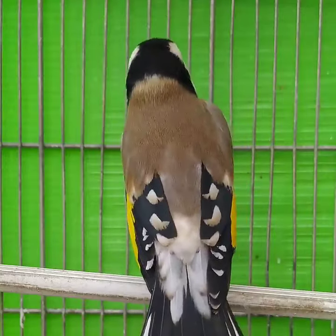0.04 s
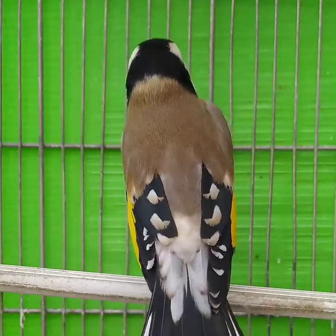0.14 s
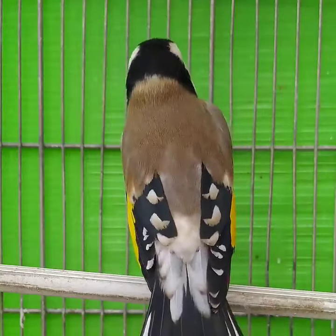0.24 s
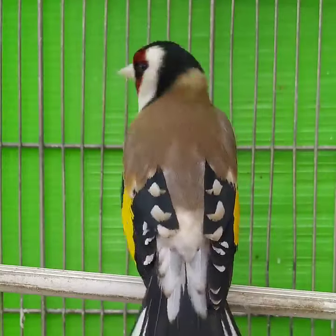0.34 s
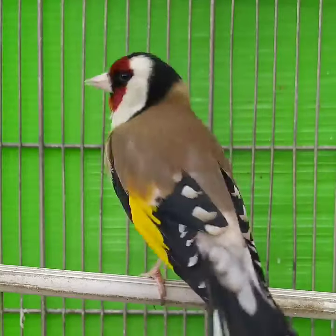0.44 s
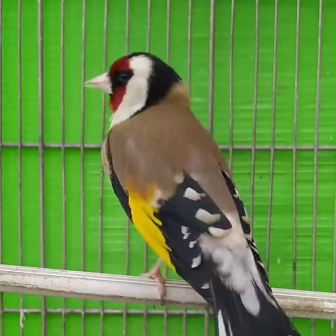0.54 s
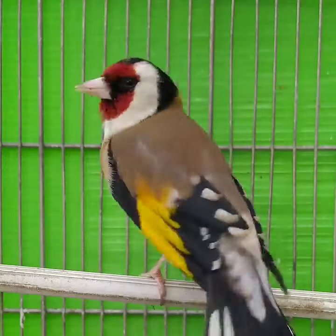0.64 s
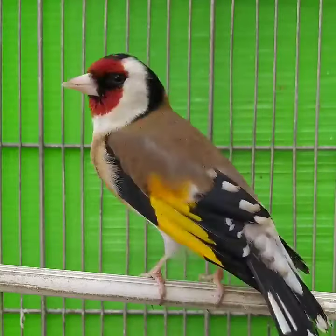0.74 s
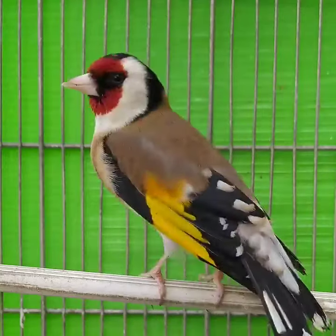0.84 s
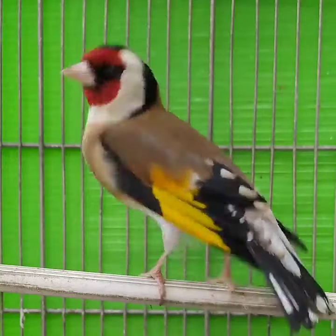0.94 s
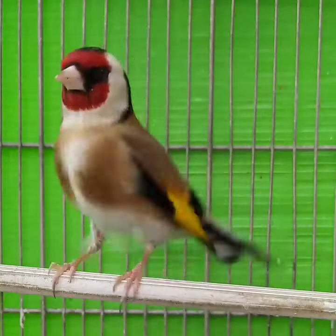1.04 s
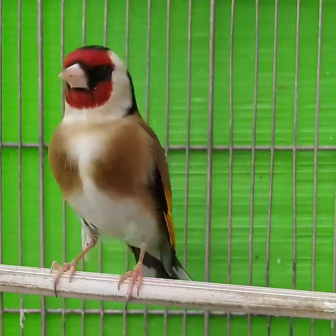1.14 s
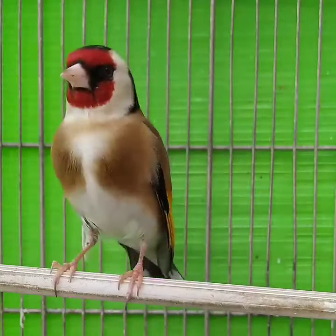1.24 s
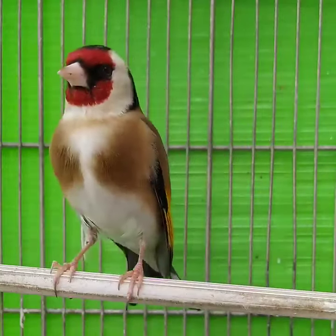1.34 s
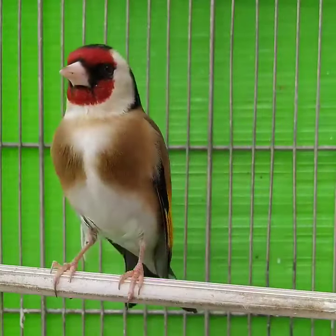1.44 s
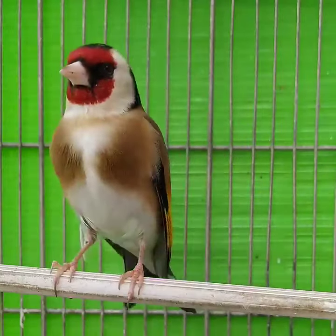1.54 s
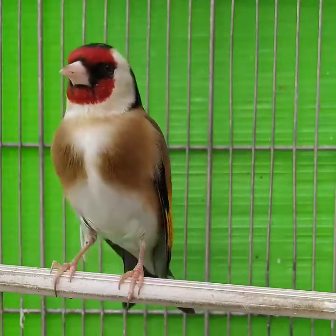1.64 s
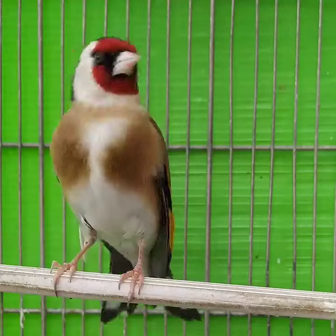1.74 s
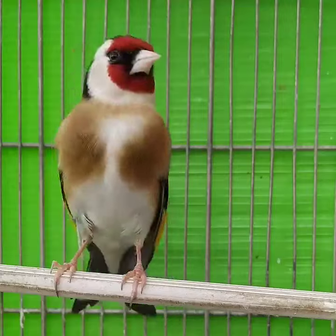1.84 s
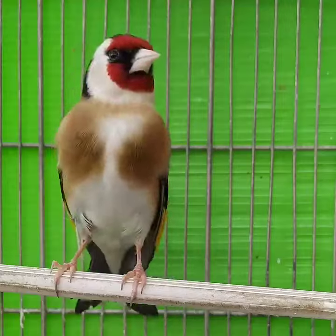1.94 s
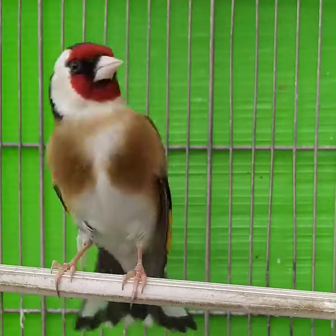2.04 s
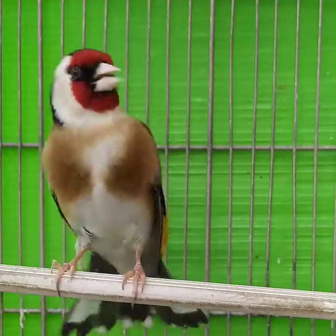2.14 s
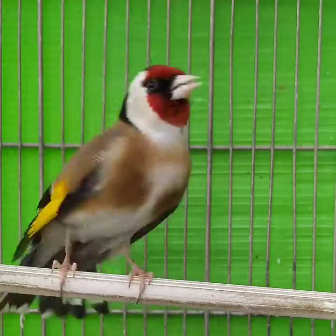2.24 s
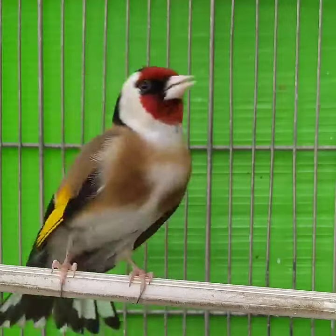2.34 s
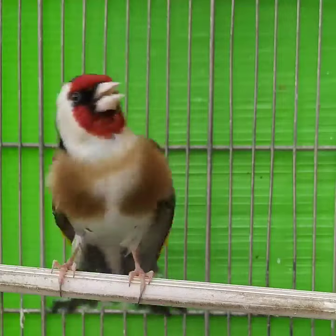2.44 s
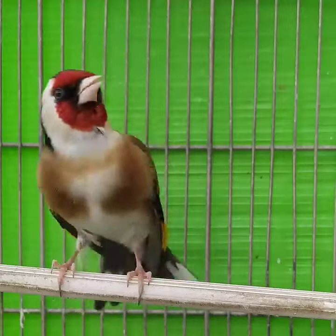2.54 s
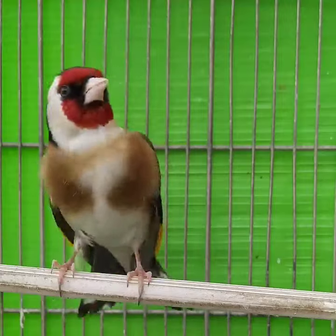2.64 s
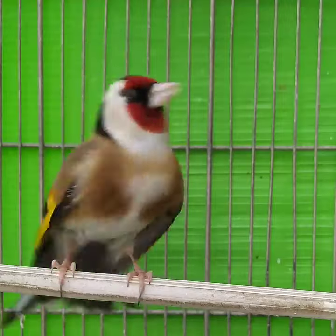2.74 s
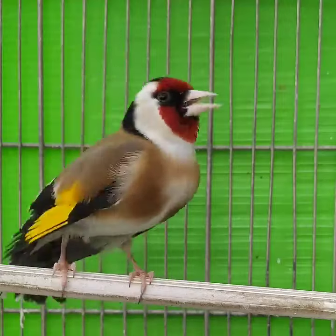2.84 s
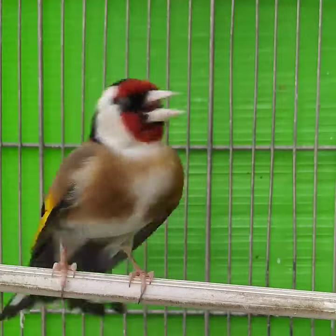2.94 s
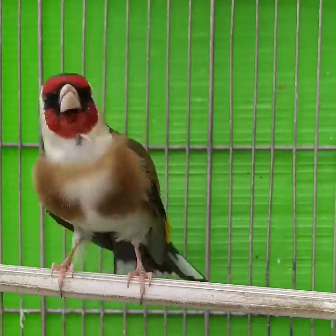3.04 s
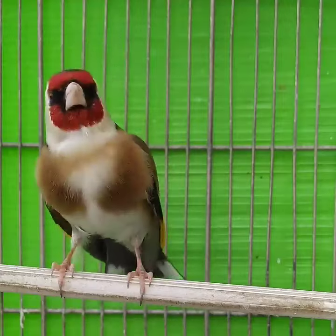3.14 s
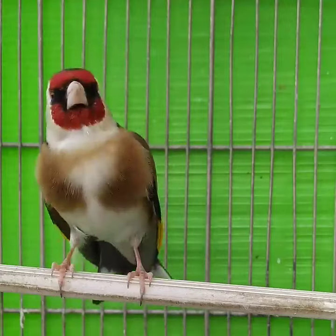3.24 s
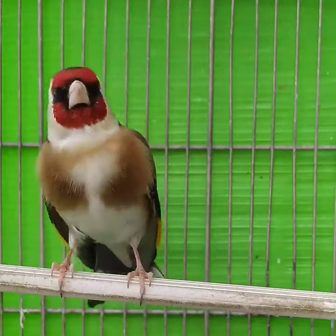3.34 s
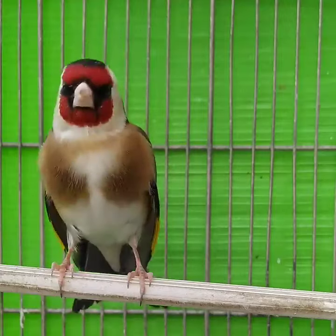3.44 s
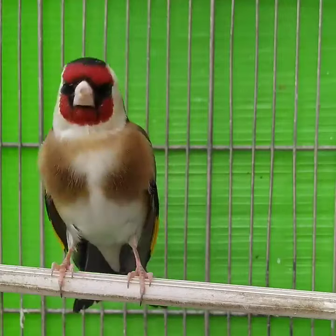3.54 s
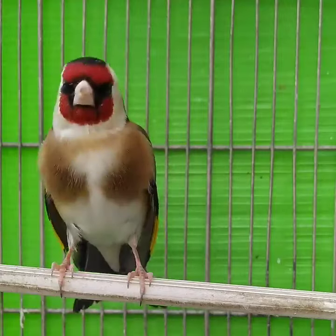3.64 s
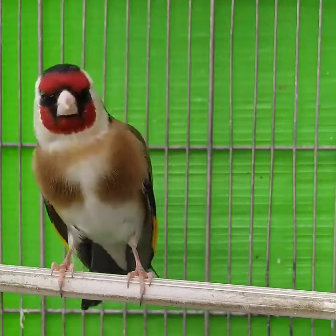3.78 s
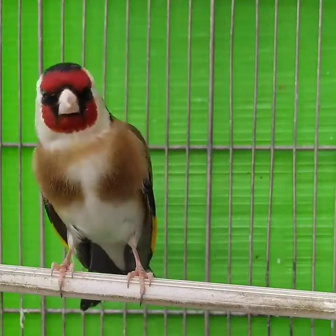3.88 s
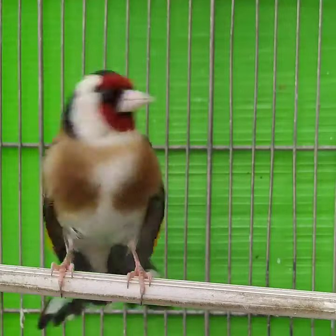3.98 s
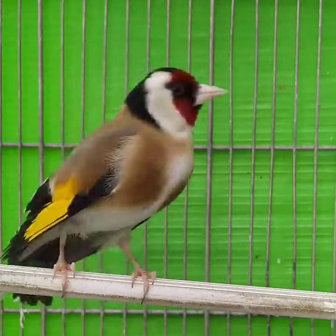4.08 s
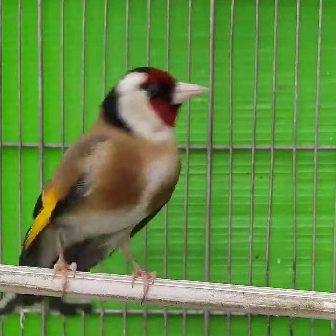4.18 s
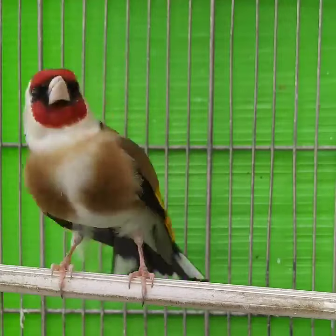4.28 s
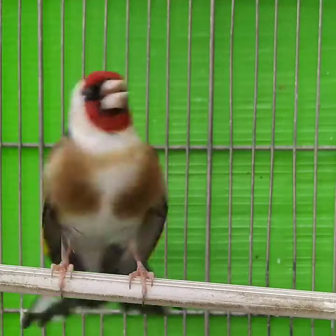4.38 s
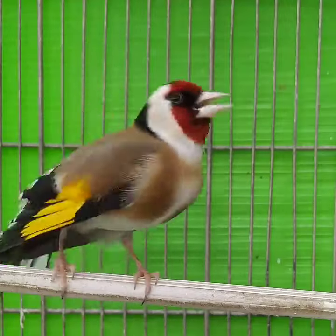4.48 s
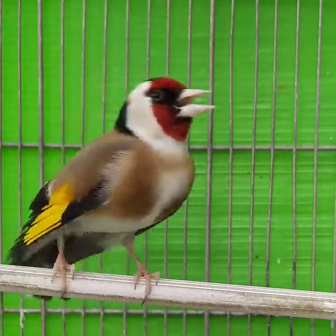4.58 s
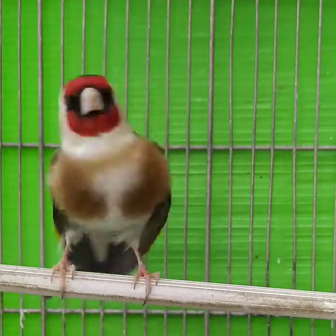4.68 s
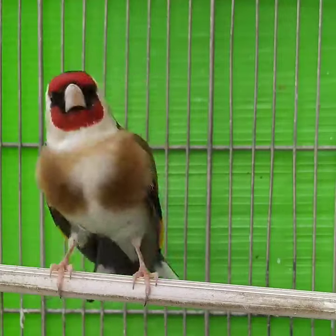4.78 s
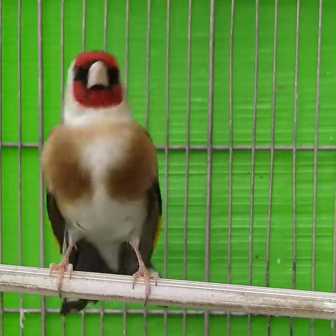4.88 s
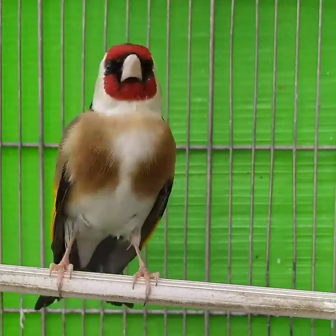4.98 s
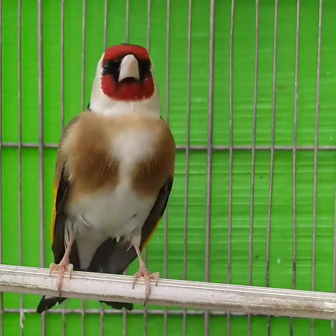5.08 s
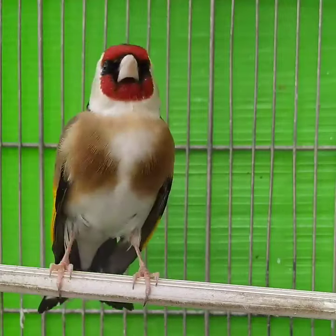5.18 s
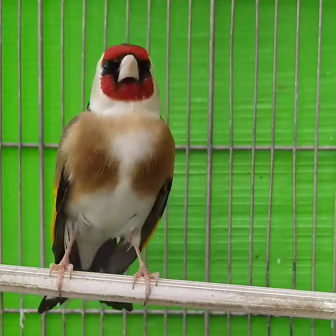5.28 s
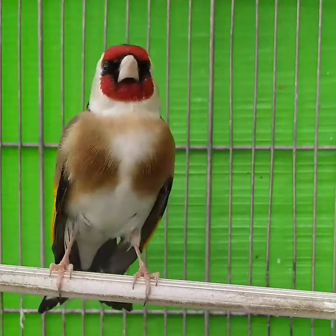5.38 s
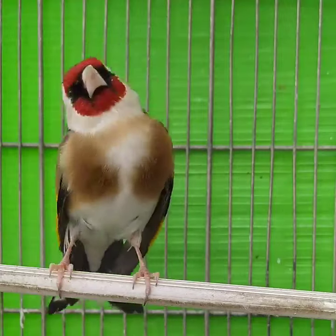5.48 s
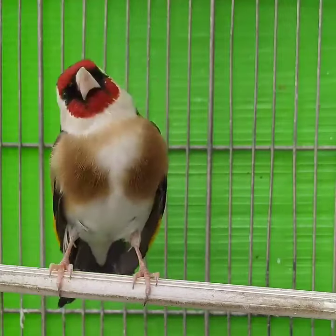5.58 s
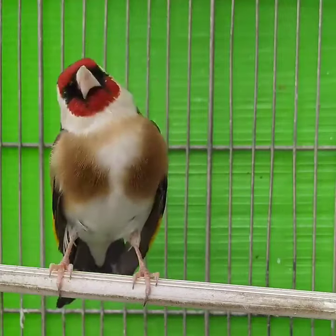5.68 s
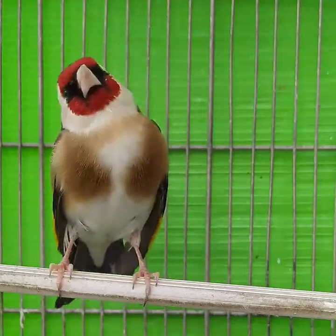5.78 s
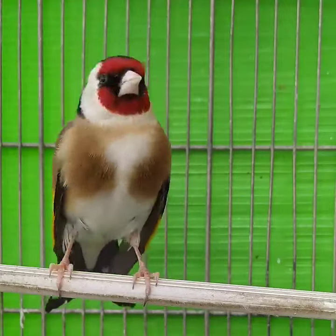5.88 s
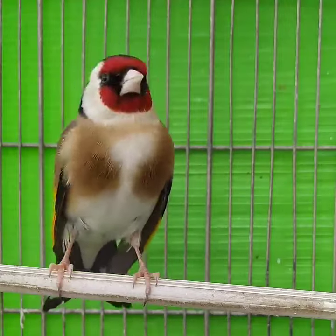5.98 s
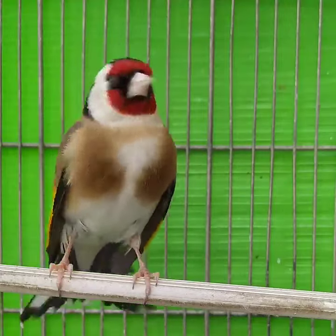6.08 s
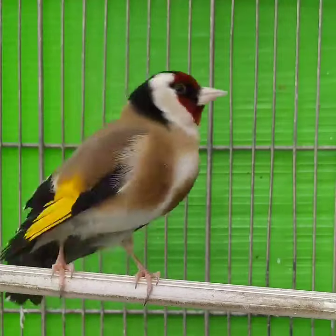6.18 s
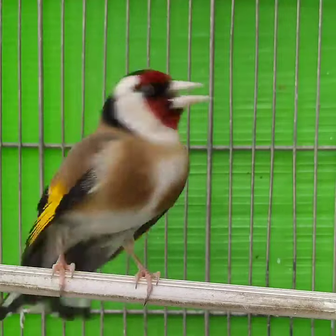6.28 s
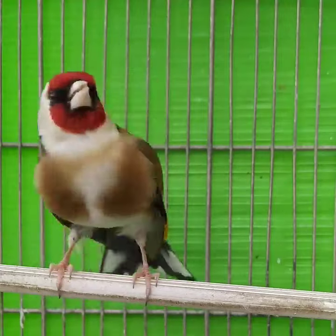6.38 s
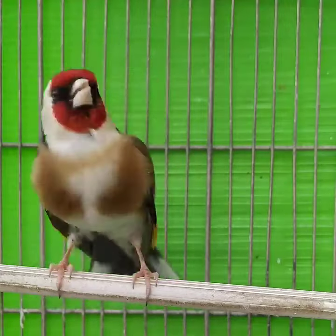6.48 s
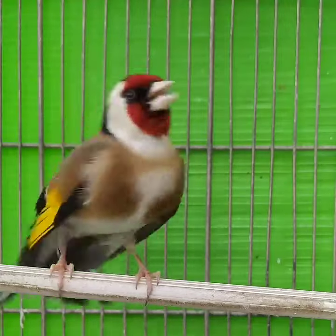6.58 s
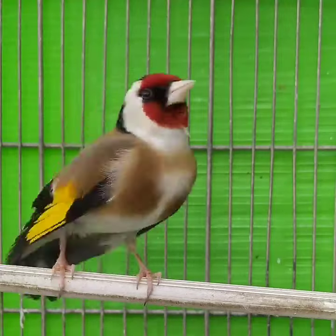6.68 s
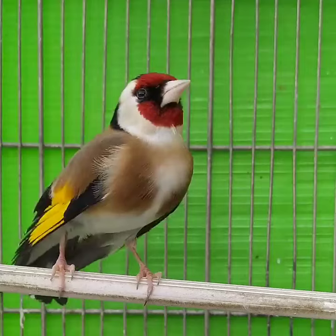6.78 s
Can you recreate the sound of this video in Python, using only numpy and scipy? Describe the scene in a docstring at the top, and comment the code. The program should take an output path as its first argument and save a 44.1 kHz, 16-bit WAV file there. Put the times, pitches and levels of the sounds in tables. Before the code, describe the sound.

Near small songbird whistles softly, then twitters rapidly in short, piercing bursts, a fainter bird answering, over low traffic hum and thin hiss.

```python
"""Caged finch, close

A caged finch twitters in short bursts close to a pair of microphone ports a hand apart; a second bird
answers from further off. Each bird is two membranes whistling at once, with overtones, mixed tones and
noise that follows the loudness; each song reaches the right port first, then come walls and room.
Feathers rustle now and then as grainy puffs of noise. Outside, distant traffic is a wash of shaped
noise under a thin hiss, with a few drifting engine tones."""
import sys
import numpy as np
from scipy import signal
from scipy.fft import rfft, irfft, next_fast_len
from scipy.io import wavfile
from scipy.ndimage import uniform_filter1d, map_coordinates

SR = 44100
rng = np.random.default_rng(int(sys.argv[2]) if len(sys.argv) > 2 else 0)


def store_wav(level_fs):
    """Save 16-bit WAV to argv[1]."""
    pcm = np.round(np.clip(np.atleast_2d(level_fs), -1, 1) * 32767)
    wavfile.write(sys.argv[1], SR, pcm.T.astype(np.int16))


N = 300762
TOP_HZ = 16100  # band limit
SLUR = -1  # in place of an attack: the note before melts into this one
SLUR_SHARE = .3  # share of the slurred note that the melting takes
EDGE_DB = 20  # level drop across each attack or release

# Distant traffic over time: (time [s], hum level [dB], hiss level [dB]), both before a small trim
TRAFFIC_LEVELS = [(0.0, -44.5, -62.5), (1.42, -40, -57), (3.06, -38, -48), (3.21, -41.5, -60),
                  (5.58, -43, -59.5), (6.82, -36.5, -42.5)]
# Colour of the low wash, relative: (frequency [Hz], density [dB per Hz])
HUM_COLOUR = [(12, -37.5), (20, -12), (65, -3), (98, -7), (139, -4), (216, -5.5), (254, -1), (432, -9),
              (557, -2), (686, -5.5), (864, -4), (1440, -3.5), (2130, -9.5), (3080, -17), (5000, -28.5),
              (6500, -50.5), (11000, -120)]
# Colour of the thin hiss, relative: (frequency [Hz], density [dB per Hz])
HISS_COLOUR = [(1760, -37), (3000, -8.5), (4050, -14.5), (5330, -1.5), (6000, -9), (7560, 0),
               (11000, -20.5), (14400, -32), (16000, -40)]
# Far engine tones: (mean pitch [Hz], mean level [dB])
ENGINE_TONES = [(141, -60), (271, -63), (631, -60)]

# Feather rustles: (time [s], level before the onset ramp [dB], decay length [s])
RUSTLE_PUFFS = [(0.022, -50, 0.026), (0.097, -49.5, 0.095), (0.798, -46, 0.015), (0.87, -50, 0.032),
                (1.28, -48, 0.027), (1.58, -56, 0.036), (1.704, -41.5, 0.057), (3.584, -38.5, 0.041),
                (3.773, -38, 0.051), (3.866, -32, 0.039), (6.26, -41, .07)]
# Colour of feathers, relative: (frequency [Hz], density [dB per Hz])
FEATHER_COLOUR = [(2000, -42), (4000, 11), (7000, 11.5), (9000, 8.5), (12000, -57), (16000, -20.5)]

# Stereo picture of traffic and feathers at the two ports:
# (frequency [Hz], left-right likeness [-1 to 1])
PORT_LIKENESS = [(60, 0.99), (180, 0.97), (550, 1), (1650, 0.98), (4970, -0.55), (15000, 1)]
# (frequency [Hz], left minus right [dB])
NOISE_LEAN = [(60, -1), (180, -0.5), (550, 2.5), (1650, 0.5), (4970, 0), (15000, 5.5)]
# the wash comes from one side: (frequency [Hz], phase lead of the left port [rad])
NOISE_TWIST = [(250, 0.13), (1000, 1), (2500, 1.4)]

# Nearby walls: (delay [s], left level [dB], right level [dB]), scaled for each bird by its wall level
WALL_ECHOES = [(.0012, 0.5, -15), (.0046, -25.5, -1.5), (0.013, -24, -18), (0.023, -28, -28)]
# Decay of the room: (frequency [Hz], time to fall 60 dB [s])
ROOM_DECAY = [(2000, 0.2), (5000, 0.27), (12000, 0.099)]
# Far bird at the ports: (frequency [Hz], left minus right [dB])
FAR_BIRD_LEAN = [(3500, 11.5), (7000, 3.5)]
# Near bird at the ports: (frequency [Hz], left minus right [dB])
NEAR_BIRD_LEAN = [(1500, 3), (2900, -3), (4500, 0), (8000, 1.5), (14000, 3.5)]

# Tones at m x left pitch + n x right pitch while both sides sound: (m [-], n [-])
MIXED_TONES = [(1, 1), (2, -1), (-1, 2), (2, 1), (1, 2), (3, -1), (-1, 3)]
# Strength of each mixed tone: one column (level [dB])
MIXED_TONE_DB = [-1.5, -15, -12.5, -6, -10, -10.5, -8]
# Hoarse stretches, where pitch and level flutter more and a rasp is added: (from [s], to [s], roughness [0-1])
HOARSE_STRETCHES = [(2.262, 2.3, .25), (2.36, 2.43, .6), (2.795, 2.835, .25), (2.895, 2.965, .6),
                    (3.6, 3.67, .6), (3.765, 3.82, .4), (3.86, 3.91, .8), (4.472, 4.54, .4),
                    (4.59, 4.615, .2), (4.709, 4.735, .6), (6.26, 6.33, .6), (6.404, 6.465, 1),
                    (6.49, 6.59, .5), (6.713, 6.74, .6)]
# What leaves the beak: (frequency [Hz], gain [dB])
BEAK_GAIN = [(1000, -4.5), (1800, -17.5), (2600, -1), (8000, 4), (9800, -3.5), (12500, 6), (16000, 6.5)]
# Faint treble noise that follows the loudness of the notes, relative: (frequency [Hz], density [dB per Hz])
TREBLE_COLOUR = [(6000, -29), (9500, -14), (11000, -1.5), (16000, -24)]
# Rasping noise of the hoarse stretches, relative: (frequency [Hz], density [dB per Hz])
RASP_COLOUR = [(1500, -26.5), (3000, 7.5), (5500, 0.5), (8000, -3.5), (9500, -22.5), (12500, -18),
               (16000, -30)]

# Every note table below has one row a note, its level and pitch before flutter and beak:
# (start [s], length [s], first pitch [Hz], last pitch [Hz], glide haste [1/s], full level [dB], attack [s],
#  release [s], throat resonance over pitch at the start [ratio], the same at the end [ratio])
# Glide haste over 0 makes the glide come early, under 0 late.
# Far bird, left side of the voice box; columns as above
FAR_LEFT_NOTES = [(0, .2, 3377, 3290, 2.5, -58.5, .001, .02, 1, 1),
                  (1.725, .065, 1690, 2390, 15.5, -46, .03, 0, 1.9, 1.2),
                  (1.79, .24, 2390, 2950, 0, -44, SLUR, 0.049, 1.56, 0.95),
                  (3.615, 0.053, 3350, 2870, -58, -31.5, 0.0396, .04, 1.5, 1.1),
                  (3.675, .085, 3150, 3544, 58, -36, 0.031, .025, 1.57, 2),
                  (3.782, .03, 3450, 4020, 70, -31.5, 0.01, .012, 1.05, 0.89),
                  (3.82, .068, 4480, 4600, 95, -23.5, 0.009, 0.091, 1.67, 1.6),
                  (6.263, .034, 6610, 6560, 100, -50, .002, 0.032, 1, 1)]
# Far bird, right side; columns as above
FAR_RIGHT_NOTES = [(0, .08, 2450, 2365, 1, -50, .08, .005, 0.9, 0.78),
                   (3.61, .045, 4600, 4500, 103, -44, 0.0082, .04, 1, 1),
                   (3.768, 0.02, 4640, 6110, 10, -35.5, .008, .015, 1, 1),
                   (3.81, 0.02, 3120, 3950, 128, -40.5, .001, .015, 1, 1),
                   (3.853, .047, 4030, 2836, 1.5, -41.5, .03, .01, 1.95, 1.95),
                   (6.283, 0.041, 4550, 4560, 3, -41, .02, .022, 1, 1)]
# Near bird, left side, notes sung once; columns as above
NEAR_LEFT_NOTES = [(.461, .089, 1500, 2210, 32, -31, 0.019, 0, 1.4, 1.63),
                   (.55, .12, 2208, 2420, 3, -32.5, SLUR, 0, 1.6, 1.53),
                   (.67, .12, 2420, 2570, 30.5, -28.5, SLUR, 0.018, 1.5, 0.88),
                   (4.445, .103, 1140, 1780, 13, -24, .06, .04, 4.1, 2.26),
                   (4.564, .025, 1934, 2190, 13, -29, 0.0033, 0, 1.5, 2.3),
                   (4.59, 0.022, 2196, 2700, 121.5, -22, 0.00033, .012, 2.2, 2),
                   (4.621, .035, 2574, 3200, 18, -3.5, 0.025, 0.0178, 1.4, 1.1),
                   (4.656, .047, 3200, 3470, 38.5, -10.5, SLUR, 0.058, 1.92, 1.72),
                   (6.353, 0.011, 3220, 5260, -37.5, -16, 0.0028, .008, 1.8, 1.2),
                   (6.381, 0.025, 6840, 7800, 15, -11.5, 0.0034, 0.013, 1, 1),
                   (6.466, 0.032, 3550, 3900, 47.5, -32.5, 0.0049, 0, 1.5, 1),
                   (6.503, .08, 1180, 1480, 9.5, -21.5, 0.056, .01, 1.7, 2.8),
                   (6.585, .056, 3250, 3520, 9, -10.5, .08, 0.0098, 1.5, 1.01)]
# Near bird, right side, notes sung once; columns as above
NEAR_RIGHT_NOTES = [(4.473, .084, 1800, 2313, 1, -26, 0.0033, .04, 3.3, 1.6),
                    (4.592, .042, 2860, 4324, 1.5, -13.5, 0.022, 0.0196, 1.67, .9),
                    (6.357, .025, 6136, 6900, 57, -13, 0.0011, 0.021, 1, 1.3),
                    (6.404, .061, 6730, 6780, -7, -42.5, .03, 0.00085, 0.69, 1),
                    (6.492, .018, 3752, 4394, -1, -37, .005, 0.0056, 1.05, 1.05),
                    (6.57, 0.058, 1679, 2156, 37, -11.5, 0.045, 0.021, 2.34, 2),
                    (6.636, 0.032, 2590, 3270, 31.5, -10, 0.0065, 0.015, 1.1, 0.9),
                    (6.665, 0.0377, 3270, 3468, 41.5, -22.5, SLUR, .015, 1.25, 2.28)]
# The twitter, left side; columns as above, starts count from the start of the twitter
TWITTER_LEFT_NOTES = [(0, .037, 3410, 4200, 55, -11, 0.035, .016, 2.1, 0.6),
                      (.055, .008, 3292, 4900, 121.5, -7.5, 0.014, .001, 1, 1.05),
                      (.151, .017, 3185, 3260, -0.5, -21, .007, 0.012, 1.3, 0.91),
                      (.184, .021, 4320, 4850, 3, -3.5, .012, .012, 1, 1),
                      (.247, .05, 4580, 3372, -20, -12.5, 0.034, 0, 1.02, 1.3),
                      (.297, 0.068, 3394, 2877, 56, -10.5, SLUR, 0.0039, 1.02, .98),
                      (.35, .065, 2872, 2870, -2.5, -12, SLUR, 0.029, .98, 0.75)]
# The twitter, right side; columns as above, starts count from the start of the twitter
TWITTER_RIGHT_NOTES = [(0, .028, 2580, 3070, 30.5, -9.5, .01, 0.0374, 1.9, 2.1),
                       (.028, .027, 3080, 3247, 38, -20.5, SLUR, .01, 1.1, 1),
                       (.058, .021, 2500, 5180, -25, -0.5, .008, 0.024, 1.1, 1),
                       (.103, .053, 1390, 1658, -41, -16.5, 0.038, 0.026, 2.2, 1.9),
                       (.204, .042, 3500, 6157, 262.5, -2.5, .001, 0.062, 1, 1),
                       (.247, 0.047, 5980, 5550, 24, -13, 0.028, 0.019, 1, 1)]
# Both twitters: (start [s], louder by [dB], drawn out by [factor], broken off after [s])
TWITTER_TIMES = [(2.262, 0.5, 1.001, .415), (2.792, 0, 1.015, .374)]
# The closing chip, second part: a quieter down-sweep 4 ms after the first, like a quick echo,
# then a falling tail; columns as above, starts count from the start of the chip
CHIP_LEFT_NOTES = [(.004, .0095, 6080, 3230, 153, -14.5, .001, .006, 1.1, 1.3),
                   (.0135, 0.0064, 3204, 2550, 30, -22, 0.0036, .001, 1.3, 1.7),
                   (.029, .026, 2780, 2420, -29, -18, .002, .02, 1.1, 1.5)]
# The closing chip, first part: the louder down-sweep and its fall; columns as above, from the chip's start
CHIP_RIGHT_NOTES = [(0, .0075, 6144, 3042, 60, -6.5, 0.00046, 0.0053, 1, 1.6),
                    (.0075, .021, 3090, 1477, 60.2, -14, .01, 0.015, 1.45, 2.3)]
# Both chips: (start [s], louder by [dB], drawn out by [factor], broken off after [s])
CHIP_TIMES = [(4.7055, -1, 1, .06), (6.7095, 1, 1, .06)]


def amp(db):
    """Decibels to an amplitude factor."""
    return 10 ** (np.asarray(db) / 20)


def unit(x):
    """x scaled to rms 1."""
    return x / np.sqrt(np.mean(x ** 2) + 1e-20)


def along(points, hz):
    """(Hz, value) points read on a log frequency axis."""
    f, value = np.transpose(points)
    return np.interp(np.log(hz + 1), np.log(f + 1), value)


def wobble(rate):
    """A smooth random curve of rms 1, rate knots a second."""
    knots = rng.standard_normal(int(N * rate / SR) + 4)
    return unit(map_coordinates(knots, [np.arange(N) * rate / SR]))


def filtered(x, response):
    """x times a complex response of frequency."""
    m = next_fast_len(N + SR // 2)
    return irfft(rfft(x, m) * response(np.fft.rfftfreq(m, 1 / SR)), m)[..., :N]


def stretches(spans, t, ramp):
    """Sum of flat-topped windows (from s, to s, height) with sloped ends."""
    return sum(height * np.clip(np.minimum(t - start, end - t) / ramp + .5, 0, 1)
               for start, end, height in spans)


def rush(colour, patchy_db):
    """Stereo noise of rms 1: random patches of gain, coloured, then spread over the two ports."""
    z = signal.stft(rng.standard_normal((2, N)), nperseg=512)[2]
    patches = uniform_filter1d(rng.standard_normal(z.shape[1:]), size=6, axis=0)
    patches = uniform_filter1d(patches, size=14, axis=1)
    pair = signal.istft(z * amp(patchy_db * unit(patches)), nperseg=512)[1][:, :N]

    def mid_side(hz):
        # the angle between the ports sets how alike they are
        angle = np.arccos(np.clip(along(PORT_LIKENESS, hz), -1, 1)) / 2
        return amp(along(colour, hz)) * [np.cos(angle), np.sin(angle)]

    def lean(hz):
        log_gain = along(NOISE_LEAN, hz) * np.log(10) / 20
        return np.exp(np.outer([.5, -.5], log_gain + 1j * along(NOISE_TWIST, hz)))

    mid, side = filtered(pair, mid_side)
    return unit(filtered(np.array([mid + side, mid - side]), lean))


def traffic():
    """A low wash that swells as cars pass, and a thin hiss above it: two noises under level curves."""
    s, hum_db, hiss_db = np.transpose(TRAFFIC_LEVELS)
    t = np.arange(N) / SR
    hum = amp(np.interp(t, s, hum_db) + 0.5) * rush(HUM_COLOUR, patchy_db=1.0)
    hiss = amp(np.interp(t, s, hiss_db) + 1.5) * rush(HISS_COLOUR, patchy_db=1.2)
    return hum + hiss


def drones():
    """Far engines: sine tones that drift in pitch and strength."""
    total = 0
    for hz, db in ENGINE_TONES:
        level = amp(db + 3 * wobble(5))
        phase = 2 * np.pi * np.cumsum(hz * (1 + .015 * wobble(11))) / SR
        total = total + level * np.sin(phase)
    return total


def rustles():
    """Feathers brushing: short grainy puffs of treble noise, quick onset and exponential decay."""
    t = np.arange(N) / SR
    swell = 0
    for s, db, length in RUSTLE_PUFFS:
        onset = np.clip((t - s) / .012, 0, 1)
        swell = swell + amp(db) * onset * np.exp(-np.abs(t - s) / length)
    grain = amp(2 * wobble(190))
    return swell * grain * rush(FEATHER_COLOUR, patchy_db=1.5)


def note(start, length, first_hz, last_hz, haste, db, attack, release, throat0, throat1):
    """One note as (s, pitch Hz, level dB, throat Hz) points: a bent glide under attack, hold and release."""
    t = length * np.linspace(0, 1, 40)
    bend = haste + 1e-3  # never exactly 0
    hz = first_hz + (last_hz - first_hz) * np.expm1(-bend * t) / np.expm1(-bend * length)

    def edge(away, span):
        return np.clip(1 - (away + 1e-6) / (abs(span) + 1e-9), 0, 1)

    level = db - EDGE_DB * (edge(t, attack) + edge(length - t, release))
    throat = hz * (throat0 + (throat1 - throat0) * t / length)
    return list(zip(start + t, hz, level, throat))


def sung(once, *figures):
    """All notes of one side: those sung once, and each figure at each of its repeats."""
    rows = []
    for figure, repeats in figures:
        for at, more_db, slow, stop in repeats:
            for s, length, f0, f1, haste, db, *rest in figure:
                kept = min(length * slow, stop - s * slow)
                rows.append((at + s * slow, kept, f0, f1, haste, db + more_db, *rest))
    notes = []
    for *head, attack, release, throat0, throat1 in sorted(once + rows, key=lambda row: row[0]):
        points = note(*head, max(attack, 0), release, throat0, throat1)
        if notes:  # a side sings one note at a time
            notes[-1] = [p for p in notes[-1] if p[0] <= points[0][0]]
        if attack == SLUR:
            points = notes.pop() + points[int(SLUR_SHARE * len(points)):]
        notes.append(points)
    return notes


def membrane(notes, rough, on):
    """One membrane: its pitch, phase, strength and throat gain, for the samples in on."""
    s, *cols = np.transpose(np.concatenate(sorted(notes)))
    hz, db, throat = (np.interp(on / SR, s, c) for c in cols)
    gate = stretches([(n[0][0], n[-1][0], 1) for n in notes], on / SR, ramp=0.0062)
    # low nasal notes and hoarse ones ring a wider throat
    width = 600 + 900 * np.clip(2.2 - hz / 1500, 0, 1) + 700 * rough
    hz = hz * (1 + (.002 + .012 * rough) * wobble(500)[on])

    def passed(f):
        resonance = 1 / (1 + ((f - throat) / width) ** 2) ** 1.6
        floor = amp(-27.5) / (1 + (f / 9500) ** 4)
        return (f > 0) * (f < TOP_HZ) * (resonance + floor)

    flutter_db = (1.22 + 2.5 * rough) * wobble(250)[on]
    strength = np.sqrt(2) * amp(db + flutter_db) * np.minimum(gate, 1)
    # the level is that of all overtones together, after the throat
    strength = strength / np.sqrt(sum(passed(k * hz) ** 2 / k for k in range(1, 8)))
    return hz, 2 * np.pi * np.cumsum(hz) / SR, strength, passed


def bird(left_notes, right_notes, treble_db, rasp_db):
    """Overtones of both membranes through the throat, their mixed tones and noise, shaped by the beak."""
    spans = [(n[0][0], n[-1][0], 1) for n in left_notes + right_notes]
    on = np.flatnonzero(stretches(spans, np.arange(N) / SR, ramp=.02))  # the samples with song
    rough = stretches(HOARSE_STRETCHES, on / SR, ramp=0.0036)
    sides = [membrane(notes, rough, on) for notes in (left_notes, right_notes)]
    song = 0
    for hz, phase, strength, passed in sides:
        for k in range(1, 8):
            song = song + strength * passed(k * hz) / np.sqrt(k) * np.sin(k * phase + k * k)

    (hz1, phase1, a1, passed1), (hz2, phase2, a2, passed2) = sides
    loud = np.sqrt(np.abs(uniform_filter1d(song ** 2, size=180)))
    # for a given loudness, mixed tones are strongest when both sides are equally strong
    both = loud * 2 * np.sqrt(a1 * a2) / (a1 + a2 + 1e-9)
    for (m, n), db in zip(MIXED_TONES, MIXED_TONE_DB):
        hz = m * hz1 + n * hz2
        throat_gain = np.sqrt(passed1(hz) + passed2(hz))
        song = song + amp(db) * both * throat_gain * np.sin(m * phase1 + n * phase2)

    def noise(colour):
        return unit(filtered(rng.standard_normal(N), lambda hz: amp(along(colour, hz))))[on]

    treble = amp(treble_db) * noise(TREBLE_COLOUR)
    rasp = amp(rasp_db) * rough * noise(RASP_COLOUR)
    out = np.zeros(N)
    out[on] = song + loud * (treble + rasp)
    return filtered(out, lambda hz: amp(along(BEAK_GAIN, hz)))


def placed(x, lag, lean, wall_db, room_db):
    """A bird in its place: the left port hears x lag seconds late; walls and room answer."""
    def late(hz, s):
        return np.exp(-2j * np.pi * hz * s)

    def ports_and_walls(hz):
        ports = amp(np.outer([.5, -.5], along(lean, hz))) * [late(hz, lag), late(hz, 0)]
        walls = sum(amp([[left], [right]]) * late(hz, s) for s, left, right in WALL_ECHOES)
        return ports * (1 + amp(wall_db) * walls)

    hz, t, z = signal.stft(rng.standard_normal((2, SR // 3)), SR, nperseg=256)
    decay = amp(-60 * t / along(ROOM_DECAY, hz)[:, None])
    tail = signal.istft(z * decay, SR, nperseg=256)[1]
    tail = tail / np.linalg.norm(tail[0])
    delayed = np.pad(x, (200, 0))[None]  # the room answers 200 samples late
    room = signal.fftconvolve(delayed, tail, axes=1)[:, :N]
    return filtered(x, ports_and_walls) + amp(room_db) * room


def far_bird():
    """The answering bird: two membranes heard from further off, with a strong share of room."""
    song = bird(sung(FAR_LEFT_NOTES), sung(FAR_RIGHT_NOTES), treble_db=-40, rasp_db=1.5)
    return placed(song, lag=0.00016, lean=FAR_BIRD_LEAN, wall_db=-21, room_db=-4)


def near_bird():
    """The caged finch: two membranes heard close, with twitters and chips, walls near and little room."""
    left = sung(NEAR_LEFT_NOTES, (TWITTER_LEFT_NOTES, TWITTER_TIMES), (CHIP_LEFT_NOTES, CHIP_TIMES))
    right = sung(NEAR_RIGHT_NOTES, (TWITTER_RIGHT_NOTES, TWITTER_TIMES), (CHIP_RIGHT_NOTES, CHIP_TIMES))
    song = bird(left, right, treble_db=-44, rasp_db=3.0)
    return placed(song, lag=0.0004908, lean=NEAR_BIRD_LEAN, wall_db=-8.0, room_db=-16)


def scene():
    """Traffic and engines outside, feathers, the far bird, and the finch in front."""
    return traffic() + drones() + rustles() + far_bird() + near_bird()


def record(dry):
    """The loudest peaks are rounded off, and nothing is kept above the band limit."""
    rounded = dry / (1 + np.abs(dry / .95) ** 6) ** (1 / 6)
    return filtered(rounded, lambda hz: hz < TOP_HZ)


dry = scene()
out = record(dry)
store_wav(out)
```